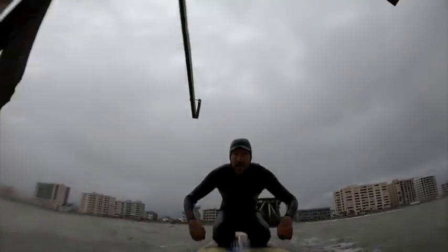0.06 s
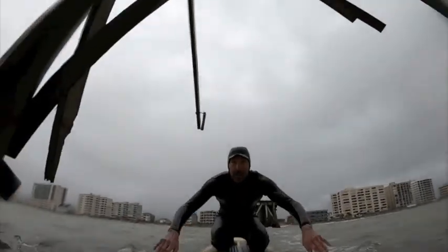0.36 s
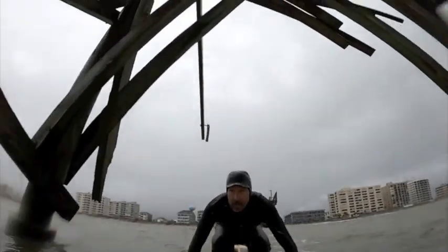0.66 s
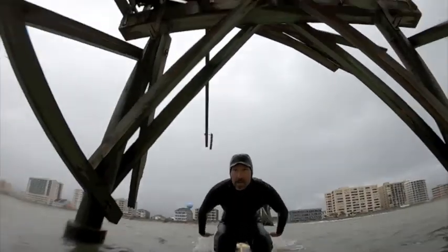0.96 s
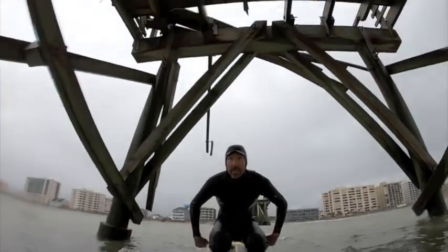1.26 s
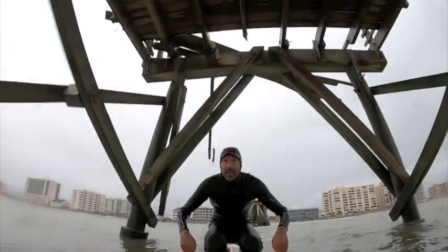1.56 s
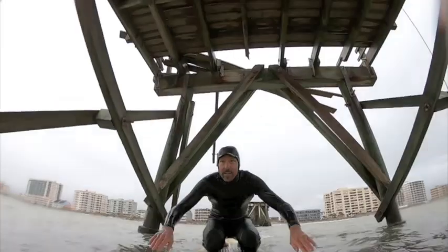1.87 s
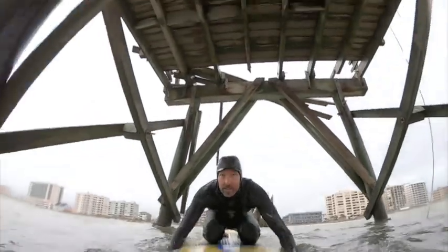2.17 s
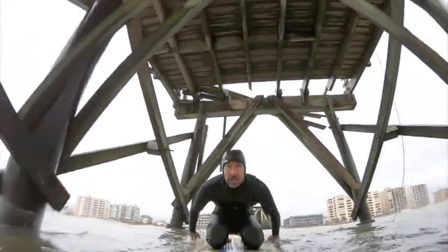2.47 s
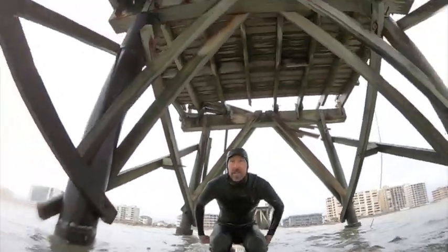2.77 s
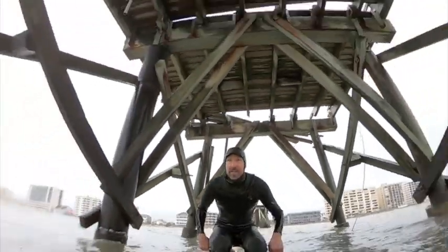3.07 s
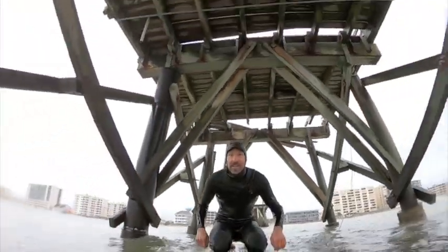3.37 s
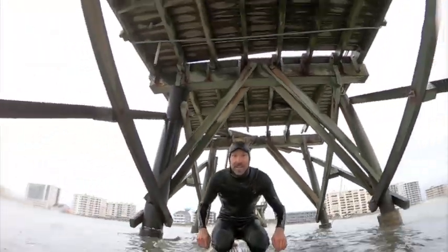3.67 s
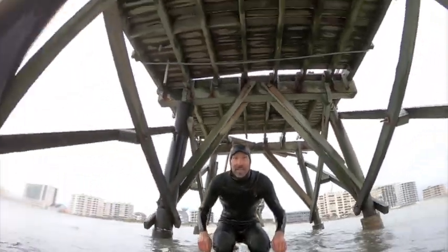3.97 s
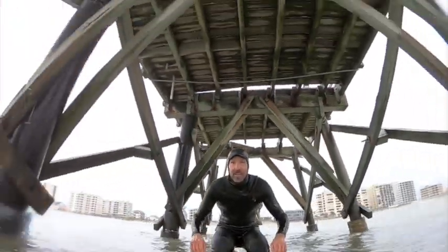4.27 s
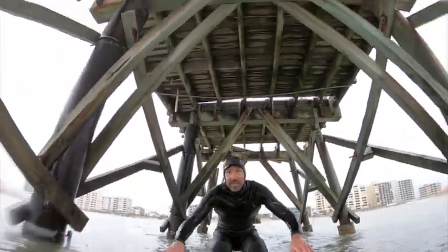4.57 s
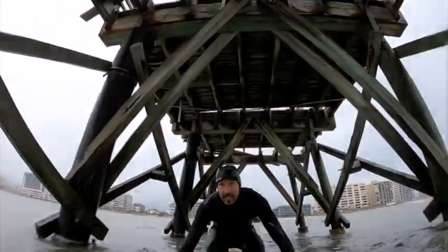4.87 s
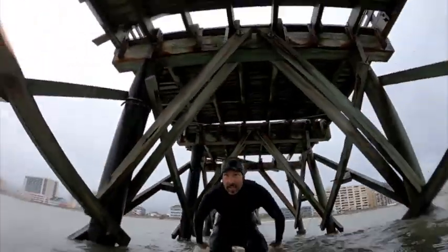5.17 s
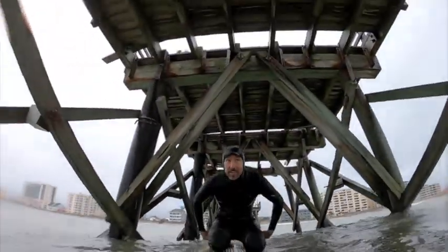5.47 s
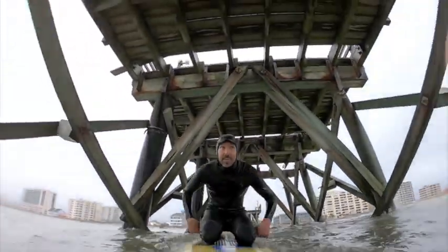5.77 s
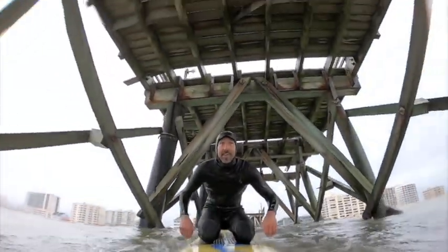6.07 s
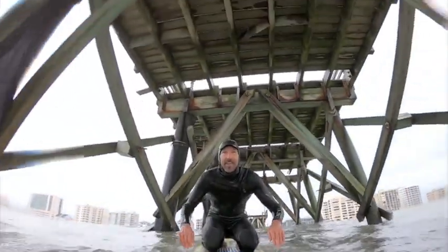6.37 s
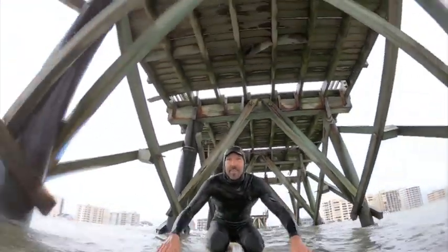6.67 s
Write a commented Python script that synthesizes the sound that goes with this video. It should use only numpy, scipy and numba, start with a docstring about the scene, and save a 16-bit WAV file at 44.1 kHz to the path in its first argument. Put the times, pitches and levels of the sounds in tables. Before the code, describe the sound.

Sea water sloshes and gurgles right at the nose of a surfboard as someone paddles by hand. Splashes come in uneven clusters, slightly dulled by the microphone's waterproof housing, with plopping air pockets, scattered drips and a light fizz of foam. Soft wind rumbles underneath. Dull shoves of swell bump the board now and then, coming thicker in the last couple of seconds as the splashing continues.

```python
"""Paddling a surfboard under a pier

A kneeling surfer paddles through choppy sea, heard from a sealed camera on the board's nose.
Hands and chop throw up splashes: clouds of small bubbles, big air pockets that gulp, drops that
fall back or smack the deck. Water churns along the hull, foam fizzes, and wind and swell
buffet the housing."""
import sys
import numpy as np
from scipy import signal
from scipy.fft import rfft, irfft, next_fast_len
from scipy.io import wavfile
from scipy.ndimage import uniform_filter1d
from numba import njit

SR = 44100
rng = np.random.default_rng(int(sys.argv[2]) if len(sys.argv) > 2 else 0)


def digitize_waveform(pressure):
    """Quantize a signal to 16-bit integers and store it at the path in sys.argv[1].

    Rows of a 2-D input are taken as channels; values are limited to [-1, 1].
    """
    field = np.atleast_2d(pressure).T
    bounded = np.clip(field, -1, 1)
    quanta = np.round(bounded * 32767).astype(np.int16)
    wavfile.write(sys.argv[1], SR, quanta)


N = 304731
T = np.arange(N) / SR


def undb(db):
    """Decibels to gain."""
    return 10 ** (np.asarray(db) / 20)


def unit(x):
    """Scale to rms 1."""
    return x / np.sqrt(np.mean(x ** 2))


def gains(table):
    """One gain curve per dB column of a timed table."""
    time_s, *columns_db = np.transpose(table)
    return [undb(np.interp(T, time_s, db)) for db in columns_db]


def colour(x, points):
    """Minimum-phase filter through (freq_hz, gain_db) points; output at rms 1."""
    hz, db = np.transpose(points)
    size = next_fast_len(N + SR // 2, True)
    bins_hz = np.maximum(np.fft.rfftfreq(size, 1 / SR), 1)
    response = undb(np.interp(np.log(bins_hz), np.log(hz), db))
    rolloff = np.hypot(1, (bins_hz / hz[-1] / 2) ** 2)
    cepstrum = irfft(np.log(response / rolloff), size)
    cepstrum[1:size // 2] *= 2
    cepstrum[size // 2 + 1:] = 0
    return unit(irfft(rfft(x, size) * np.exp(rfft(cepstrum)), size)[:N])


def noise(points):
    """Noise shaped by (freq_hz, gain_db) points."""
    return colour(rng.standard_normal(N), points)


def even(x, span_s):
    """Level out swells slower than span_s; keep the fine grain."""
    size = max(int(span_s * SR), 2)
    power = uniform_filter1d(uniform_filter1d(x ** 2, size), size)
    return x / np.sqrt(np.abs(power) + 1e-9)


def flutter(rate_hz, spread_db):
    """Randomly wandering gain, mean power 1."""
    steps = rng.standard_normal(N // 100)
    return unit(undb(spread_db * np.interp(T * rate_hz, np.arange(len(steps)), steps)))


def burst(peak_s, rise_s, fall_s, roundness=1.69):
    """Envelope of a burst of water; roundness 1 is pointed, 2 a bell."""
    away = np.maximum((peak_s - T) / rise_s, (T - peak_s) / fall_s)
    out, near = np.zeros(N), away < 10
    out[near] = np.exp(-away[near] ** roundness)
    return out


def blows(rows, rise_s, fall_s):
    """Exponential rise and fall for each (start_s, level_db)."""
    out = np.zeros(N)
    for start_s, level_db in rows:
        past_peak_s = T - start_s - rise_s
        exponent = np.minimum(past_peak_s / rise_s, -past_peak_s / fall_s)
        out += undb(level_db) * np.exp(np.maximum(exponent, -30))
    return out


def lingering(power, settle_s):
    """Gain that builds with splash power and settles afterwards."""
    keep = np.exp(-1 / (settle_s * SR))
    return np.sqrt(signal.lfilter([1 - keep], [1, -keep], power + 1e-18))


@njit
def resonate(x, hz, q):
    """Band-pass with a moving centre."""
    out, band, low = np.empty(len(x)), 0., 0.
    for i in range(len(x)):
        g = np.tan(np.pi * hz[i] / SR)
        v = (band + g * (x[i] - low)) / (1 + g * (g + 1 / q))
        band, low, out[i] = 2 * v - band, low + 2 * g * v, v / q
    return out


@njit
def bubbles(start_s, hz, gain, cycles, glide, onset_cycles):
    """Sines that die by 60 dB over `cycles`; positive glide lifts the pitch, as near the surface."""
    out = np.zeros(N)
    for k in range(len(hz)):
        first, length = int(start_s[k] * SR), int(cycles[k] / hz[k] * SR)
        fade, opening = np.exp(-np.log(1000) / length), np.exp(-hz[k] / (onset_cycles * SR))
        phase, ring, shut = 0., gain[k], 1.
        for i in range(min(length, N - first)):
            phase += 2 * np.pi * hz[k] * (1 + glide * (i / length - .2)) / SR
            ring, shut = ring * fade, shut * opening
            out[first + i] += ring * (1 - shut) * np.sin(phase)
    return out


def cloud(per_s, low_hz, high_hz, cycles, spread_db):
    """Steady bubble swarm, uniform in pitch; a few are much louder than the rest."""
    when, pitch, loud, life = rng.random((int(per_s * N / SR), 4)).T
    hz = low_hz + (high_hz - low_hz) * pitch
    gain = undb(-spread_db * np.log(loud + 0.017))
    ring_cycles = 1 + cycles * 2 * life
    return unit(bubbles(when * (N - 1) / SR, hz, gain, ring_cycles, glide=0.18, onset_cycles=0.11))


def plops(rows, cycles, glide, onset_cycles, gain_db):
    """One bubble per (start_s, pitch_hz, level_db)."""
    start_s, hz, level_db = np.array(rows, float).T.copy()
    ring_cycles = np.full(len(hz), float(cycles))
    return bubbles(start_s, hz, undb(level_db + gain_db), ring_cycles, glide, onset_cycles)


# Flow along the hull: time_s, gurgle_db, patter_db
HULL_FLOW = [(0, -44.5, -54), (.5, -48.5, -50), (.72, -47.5, -54), (1.03, -45.5, -48), (1.55, -43, -53),
             (2.4, -42.5, -45), (2.85, -47, -53.5), (3.35, -40, -49.5), (3.85, -45, -51.5),
             (4.45, -42.5, -49.5), (4.8, -44.5, -54), (5.1, -46, -50.5), (5.45, -36, -49.5),
             (5.82, -45.5, -52.5), (6.4, -47.5, -54.5), (6.9, -46, -51.5)]
# Hull gurgle spectrum: freq_hz, gain_db
WASH_EQ = [(130, -19), (270, -2), (380, -2), (490, 2.5), (600, 1), (730, -7), (950, -16.5), (1600, -29)]
# Hull patter spectrum: freq_hz, gain_db
PATTER_EQ = [(450, -13.5), (750, -4.5), (1200, 0.5), (1750, -4), (2330, -4.5), (2650, -17.5), (3500, -22.5),
             (3900, -29), (4500, -24), (7000, -55.5)]


def wash(gurgle_power):
    """Water burbles and patters along the hull; each splash briefly stirs it up."""
    flow_gain, patter_gain = gains(HULL_FLOW)
    stir_gain = undb(-14) * lingering(gurgle_power, settle_s=0.017)
    gurgle_gain = np.hypot(undb(-1) * flow_gain, stir_gain)
    gurgle = colour(cloud(per_s=750, low_hz=150.4, high_hz=1300, cycles=23.4, spread_db=2), WASH_EQ)
    patter = colour(cloud(per_s=4000, low_hz=623, high_hz=5970, cycles=23, spread_db=3), PATTER_EQ)
    return gurgle_gain * even(gurgle, span_s=0.04) + patter_gain * even(patter, span_s=0.054)


# Wind on the housing: time_s, level_db
WIND_LEVELS = [(0, -54.5), (.7, -58), (.88, -46.5), (1.9, -54.5), (2.7, -48.5), (2.88, -57.5), (3.15, -48),
               (3.7, -57.5), (4.2, -51.5), (5, -45), (5.3, -38.5), (5.8, -45.5), (6.2, -45), (6.9, -44.5)]
# Wind spectrum: freq_hz, gain_db
WIND_EQ = [(4, -41), (20, -8.5), (40, 3), (65, -1), (120, -2.5), (175, -15.5), (300, -39), (700, -50)]


def wind(gain_db=2.1):
    """Eddies rumble on the housing."""
    return undb(gain_db) * gains(WIND_LEVELS)[0] * even(noise(WIND_EQ), span_s=0.39)


# Foam bursting near the nose: peak_s, length_s, level_db
FIZZ_PATCHES = [(0.452, 0.26, -72), (0.998, 0.35, -73), (1.562, 0.04, -66.5), (1.7, 0.34, -72.5),
                (2.45, 0.79, -74.5), (3.87, 0.41, -70), (4.206, 0.14, -68), (4.34, 0.06, -65.5),
                (4.54, 0.25, -67), (5.25, 0.48, -80), (6.36, 0.17, -78), (6.89, 0.24, -69.5)]
# Foam spectrum: freq_hz, gain_db
FOAM_EQ = [(2000, -10.5), (3300, 3.5), (3900, -1.5), (4400, -3.5), (5400, -0.5), (7500, -10.5), (9200, -12),
           (11000, -17.5)]


def foam(spray_power, steady_db=-83, trail_db=-39.5):
    """Tiny bubbles burst in a spurting hiss: faintly throughout, after splashes and in patches."""
    fizz = colour(cloud(per_s=11000, low_hz=2430, high_hz=11650, cycles=48, spread_db=3.5), FOAM_EQ)
    spurts = flutter(rate_hz=70, spread_db=3)
    patch_power = sum((undb(level_db) * burst(peak_s, length_s / 2, length_s / 2)) ** 2
                      for peak_s, length_s, level_db in FIZZ_PATCHES)
    trail = undb(trail_db) * lingering(spray_power, settle_s=0.044)
    return np.sqrt(undb(steady_db) ** 2 + trail ** 2 + patch_power) * spurts * even(fizz, span_s=0.076)


# Splashes of hands and chop: peak_s, rise_s, fall_s, cavity_hz, gurgle_db, spray_db
SPLASH_BURSTS = [(0.021, 0.035, 0.032, 338, -32.5, -42), (0.101, 0.019, 0.018, 392, -39.5, -40),
                 (0.129, 0.0035, 0.015, 416, -33, -39), (0.146, 0.068, 0.098, 330, -33, -43),
                 (0.275, 0.021, 0.019, 423, -38, -35.5), (0.303, 0.025, 0.03, 426, -30.5, -37.5),
                 (0.62, 0.024, 0.031, 443, -38, -42), (0.775, 0.021, 0.02, 400.0, -36.5, -45),
                 (0.8, 0.027, 0.039, 383, -33, -37.5), (0.965, 0.057, 0.023, 496, -61, -45.5),
                 (1.163, 0.03, 0.029, 382, -31, -36.5), (1.214, 0.086, 0.07, 413, -29.5, -39.5),
                 (1.32, 0.025, 0.062, 416, -35, -45), (1.432, 0.047, 0.043, 404, -29.5, -37.5),
                 (1.793, 0.02, 0.012, 500, -34.5, -34), (1.8, 0.07, 0.076, 505, -38, -45.5),
                 (2.064, 0.029, 0.044, 440, -39.5, -43.5), (2.187, 0.081, 0.11, 500, -39.5, -41.5),
                 (2.313, 0.031, 0.031, 600, -36, -40), (2.463, 0.015, 0.014, 495, -33.5, -40),
                 (2.484, 0.0058, 0.013, 418, -32, -34.5), (2.525, 0.022, 0.024, 462.0, -28.5, -35),
                 (2.567, 0.016, 0.05, 480.0, -38, -45), (2.645, 0.013, 0.029, 423, -26.5, -33),
                 (2.68, 0.024, 0.029, 450.0, -37, -46), (3.017, 0.043, 0.034, 376, -35.5, -38.5),
                 (3.239, 0.011, 0.018, 560, -34.5, -45), (3.498, 0.026, 0.028, 446, -26.5, -38),
                 (3.574, 0.014, 0.023, 482, -28.5, -42), (3.609, 0.039, 0.047, 453, -36, -41.5),
                 (3.67, 0.026, 0.024, 340, -29.5, -41.5), (3.87, 0.0072, 0.0079, 590, -35, -46.5),
                 (3.996, 0.07, 0.02, 476, -36.5, -44.5), (4.051, 0.046, 0.035, 282, -33, -42.5),
                 (4.165, 0.015, 0.015, 320, -41, -45.5), (4.21, 0.026, 0.0094, 334, -33.5, -42),
                 (4.251, 0.027, 0.032, 294, -31.5, -35.5), (4.522, 0.062, 0.22, 446, -57, -46.5),
                 (4.614, 0.0064, 0.013, 510.0, -35, -35.5), (4.639, 0.01, 0.009, 503, -27, -30.5),
                 (4.685, 0.028, 0.037, 446, -36, -42.5), (4.944, 0.051, 0.063, 520, -33, -41),
                 (5.186, 0.048, 0.032, 447, -39.5, -50.5), (5.324, 0.095, 0.087, 406, -35, -48.5),
                 (5.474, 0.05, 0.051, 466, -29.5, -43.5), (5.629, 0.023, 0.014, 302, -29.5, -41),
                 (5.659, 0.018, 0.024, 596, -35.5, -41), (5.939, 0.017, 0.034, 300, -31.5, -39.5),
                 (6.008, 0.039, 0.041, 480, -37, -41), (6.068, 0.05, 0.055, 460.0, -34.5, -38.5),
                 (6.163, 0.01, 0.025, 490.0, -34, -37.5), (6.202, 0.022, 0.042, 525, -31.5, -37.5),
                 (6.524, 0.006, 0.0045, 646, -30, -48), (6.55, 0.025, 0.024, 545, -27.5, -36),
                 (6.585, 0.0095, 0.015, 515, -28.5, -34), (6.613, 0.0098, 0.017, 394, -31.5, -40.5),
                 (6.691, 0.0052, 0.012, 455, -23, -32.5), (6.695, 0.049, 0.031, 328, -39, -38),
                 (6.756, 0.011, 0.013, 410, -35.5, -40.5), (6.803, 0.049, 0.027, 368, -42.5, -41.5)]
# Splash gurgle spectrum: freq_hz, gain_db
GURGLE_EQ = [(100, -13), (185, -15), (255, -0.5), (370, -9), (490, 1), (690, -2.5), (950, -7), (1600, -39)]
# Spray spectrum: freq_hz, gain_db
SPRAY_EQ = [(450, -25), (750, -6), (1150, 0), (1700, -5.5), (2380, -9), (2620, -19), (3550, -22),
            (3850, -31.5), (4300, -26.5), (6000, -45.5), (8000, -55.5), (11000, -62.5)]


def splashes(ring_db=1, sag_oct=0.34):
    """Gurgle rings a closing cavity, with spray on top. Returns sound, gurgle power, spray power."""
    gurgle = cloud(per_s=900, low_hz=136, high_hz=1227, cycles=5, spread_db=4.5)
    gurgle = even(colour(gurgle, GURGLE_EQ), span_s=0.012)
    spray = cloud(per_s=6000, low_hz=588, high_hz=8770, cycles=13.3, spread_db=3)
    spray = even(colour(spray, SPRAY_EQ), span_s=0.016)
    ringing, gurgle_power, spray_power = np.zeros((3, N))
    for peak_s, rise_s, fall_s, cavity_hz, gurgle_db, spray_db in SPLASH_BURSTS:
        near = np.abs(T - peak_s) < .35
        envelope = burst(peak_s, rise_s, fall_s)[near]
        # Pitch sinks from +sag_oct to -sag_oct as the water closes over.
        pitch_hz = cavity_hz * 2 ** (-sag_oct * np.tanh((T[near] - peak_s) / (rise_s + fall_s)))
        drive = np.roll(gurgle, rng.integers(N))[near]
        cavity = even(resonate(drive, pitch_hz, q=3.6), span_s=0.0077)
        ringing[near] += undb(gurgle_db + ring_db) * envelope * cavity
        gurgle_power[near] += (undb(gurgle_db) * envelope) ** 2
        spray_power[near] += (undb(spray_db) * envelope) ** 2
    body = (ringing + gurgle * np.sqrt(gurgle_power)) / np.hypot(1, undb(ring_db))
    return body + spray * np.sqrt(spray_power), gurgle_power, spray_power


def crackle(spray_power, gain_db=-19):
    """Small bubbles snap in the thick of each splash."""
    snaps = cloud(per_s=420, low_hz=2520, high_hz=4340, cycles=8.9, spread_db=3)
    eq = [(1500, -8.5), (2900, 5), (3600, -2.5), (4100, -13.5), (5500, -17), (9000, -39.5)]
    return undb(gain_db) * lingering(spray_power, settle_s=0.013) * colour(snaps, eq)


def stray_drops(spray_power, gain_db=-23):
    """Thrown spray lands as scattered drops, each ringing a small bubble."""
    pings = cloud(per_s=130, low_hz=970, high_hz=3700, cycles=58, spread_db=4.5)
    eq = [(700, -5), (1300, 2.5), (2300, -0.5), (4500, -20.5), (9000, -56.5)]
    return undb(gain_db) * lingering(spray_power, settle_s=0.05) * colour(pings, eq)


# Single drops on the water: start_s, pitch_hz, level_db
DROPS = [(.032, 1007, -34.5), (.095, 1085, -37), (.315, 1124, -37), (.36, 1190, -41.5), (.527, 2140, -41),
         (.797, 1155, -29), (.833, 2980, -44), (.9, 1310, -40.5), (.951, 2250, -41.5), (1.626, 1066, -39.5),
         (1.733, 3670, -51), (3.013, 1220, -40), (3.237, 1250, -35.5), (3.338, 1245, -39),
         (3.566, 2420, -41), (3.868, 825, -40.5), (3.896, 2280, -45.5), (4.046, 3360, -45),
         (4.157, 890, -38.5), (4.236, 1701, -38), (4.276, 1405, -32.5), (4.519, 1540, -34.5),
         (4.596, 3070, -47), (4.853, 2770, -47.5), (5.738, 1250, -42.5), (6.592, 3580, -41.5),
         (6.61, 1270, -30), (6.688, 2180, -34)]


def drips(tap_db=-10):
    """Each drop taps the surface and leaves a small bubble ringing."""
    tap = noise([(600, -17), (1300, -2.5), (2300, 9), (3500, -9), (5000, -28), (9000, -53)])
    impacts = blows([(s, db) for s, _, db in DROPS], rise_s=.001, fall_s=.002)
    rings = plops(DROPS, cycles=37.6, glide=0.27, onset_cycles=0.54, gain_db=7)
    return undb(tap_db) * impacts * tap + rings


# Big air pockets: start_s, pitch_hz, level_db
AIR_POCKETS = [(.033, 337, -12), (.051, 303, -20.5), (.138, 341, -15), (.161, 260, -20), (.186, 285, -26),
               (.278, 447, -18), (.294, 470, -19), (.809, 363, -17.5), (.814, 270, -30),
               (1.162, 206, -20.5), (1.205, 410, -22.5), (1.417, 553, -19), (1.536, 347, -27),
               (1.8, 577, -20.5), (1.845, 520, -19), (2.146, 533, -25), (2.222, 584, -21.5),
               (2.529, 584, -20.5), (2.645, 185, -25.5), (3.022, 251, -28), (3.494, 440, -13),
               (3.571, 523, -19.5), (3.682, 520, -19.5), (4.055, 287, -19.5), (4.244, 300, -18.5),
               (4.264, 262, -19), (4.641, 272, -22), (5.493, 500, -19), (5.657, 615, -20),
               (5.737, 290, -27.5), (6.005, 520, -19), (6.203, 568, -21), (6.412, 522, -27.5),
               (6.702, 265, -16)]


def gulps():
    """Air pockets close under the board and ring briefly."""
    return plops(AIR_POCKETS, cycles=12.85, glide=0.04, onset_cycles=2.18, gain_db=7.5)


# Spray hitting the housing: start_s, level_db
SPRAY_FLECKS = [(0.2917, -51), (3.8876, -74), (4.2044, -58), (4.556, -63), (4.635, -58), (4.8215, -68)]


def spatter(gain_db=7):
    """Flecks of spray tick on the housing."""
    tick = noise([(1000, -9), (3200, 29), (5000, 15.5), (7500, -3.5), (11000, -9)])
    return undb(gain_db) * tick * blows(SPRAY_FLECKS, rise_s=.0015, fall_s=.005)


# Swell hitting the board: start_s, level_db, pitch_hz
SHOVES = [(0.307, -36, 70), (2.136, -36, 90), (2.476, -26.5, 87), (2.635, -26.5, 93), (2.681, -26.5, 66.5),
          (3.102, -32, 46), (3.231, -36, 59.3), (3.507, -32, 142), (4.104, -32.5, 53.5), (5.244, -31, 60),
          (5.299, -29.5, 58), (5.557, -29, 88), (5.62, -27, 62.5), (5.851, -33, 60.3), (5.93, -25, 68.5),
          (5.988, -31, 65), (6.19, -24.5, 43.7), (6.334, -28, 141), (6.464, -26.5, 89), (6.653, -27.5, 85),
          (6.833, -31.5, 50)]
# Shove spectrum: freq_hz, gain_db
SHOVE_EQ = [(8, -35), (35, 0.5), (70, 0), (125, 2.5), (190, -11), (300, -24), (700, -50)]


def swell(thud_db=-5):
    """Each dull shove of the swell ends in a few slow cycles of trapped air."""
    push = blows([(s, db) for s, db, _ in SHOVES], rise_s=.009, fall_s=.026)
    thud = push * even(noise(SHOVE_EQ), span_s=0.011)
    trapped_air = [(s, hz, db) for s, db, hz in SHOVES]
    boom = plops(trapped_air, cycles=11, glide=0.11, onset_cycles=0.92, gain_db=3)
    return undb(thud_db) * thud + boom


# Water blobs on the deck, the bigger the lower: start_s, pitch_hz, level_db
DECK_BLOBS = [(.9002, 1760, -31.5), (0.985, 770, -29.5), (1.0807, 990, -27), (1.138, 700, -26),
              (2.639, 560, -21.5), (3.229, 900, -27.5), (3.471, 1250, -30.5), (4.507, 1400, -30),
              (4.52, 1900, -32), (4.61, 1230, -23.5), (4.68, 815, -24.5), (4.822, 2200, -34.5),
              (4.977, 1200, -24.5), (5.302, 370, -23.5), (5.455, 720, -22.5), (5.591, 615, -30),
              (5.626, 400, -24)]


def smacks(crack_db=-15, housing_hz=3000):
    """A blob lands flat: a crack and a few cycles of the air under it, dulled by the housing."""
    crack = noise([(500, -9), (1200, 3), (2300, 3.5), (5000, -15.5)])
    impacts = blows([(s, db) for s, _, db in DECK_BLOBS], rise_s=.0005, fall_s=.002)
    rings = plops(DECK_BLOBS, cycles=15.2, glide=-0.11, onset_cycles=0.25, gain_db=2)
    housing = signal.butter(4, housing_hz, fs=SR, output="sos")
    return signal.sosfilt(housing, undb(crack_db) * impacts * crack + rings)


def scene():
    """Water and wind around the nose of the board, mono."""
    splashing, gurgle_power, spray_power = splashes()
    drops = drips() + smacks() + stray_drops(spray_power) + spatter()
    bubbling = crackle(spray_power) + gulps() + wash(gurgle_power) + foam(spray_power)
    return (splashing + drops + bubbling + wind() + swell())[None]


def record(dry):
    """A gentle high-pass removes the slowest drift; the camera cuts the top treble."""
    low_hz, top_hz = 12, 11300
    sound = signal.sosfilt(signal.butter(2, low_hz, "high", fs=SR, output="sos"), dry)
    return signal.sosfilt(signal.ellip(8, .2, 70, top_hz, fs=SR, output="sos"), sound)


dry = scene()
out = record(dry)
digitize_waveform(out)
```